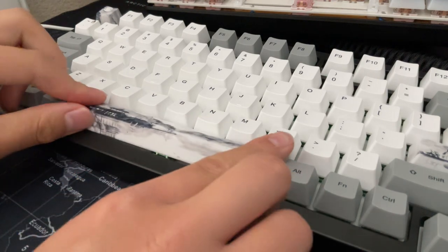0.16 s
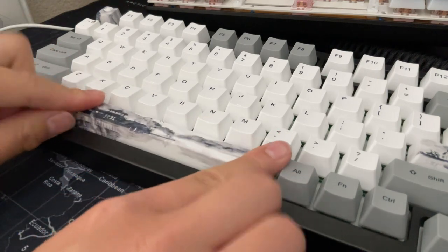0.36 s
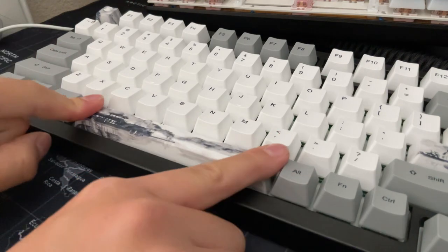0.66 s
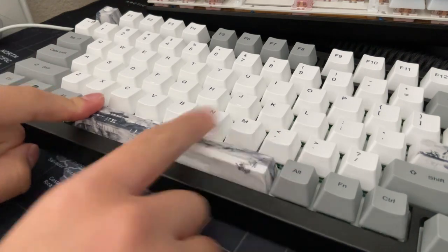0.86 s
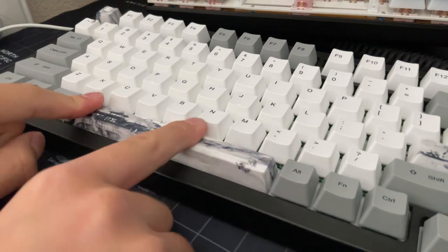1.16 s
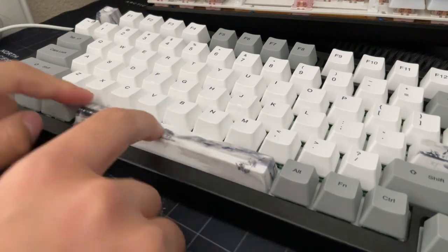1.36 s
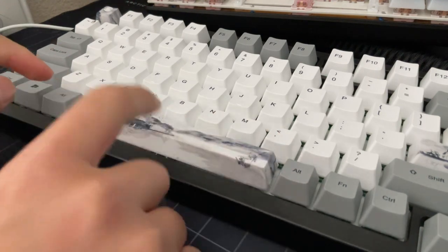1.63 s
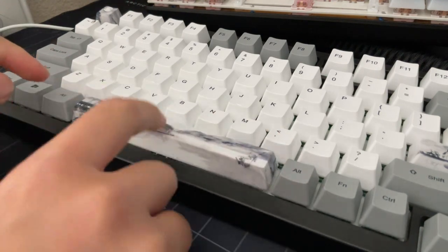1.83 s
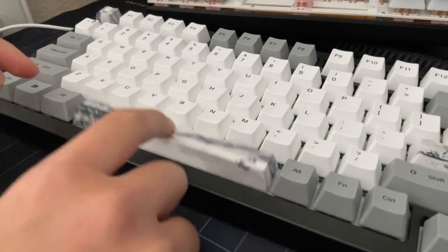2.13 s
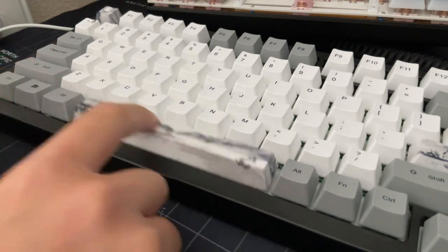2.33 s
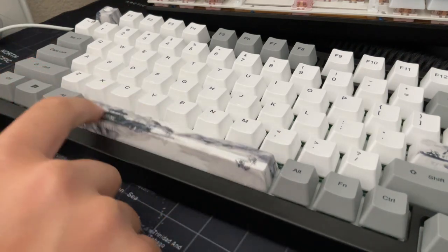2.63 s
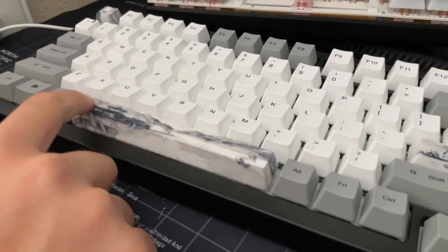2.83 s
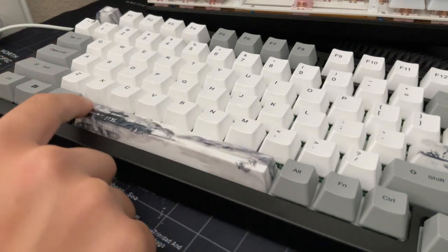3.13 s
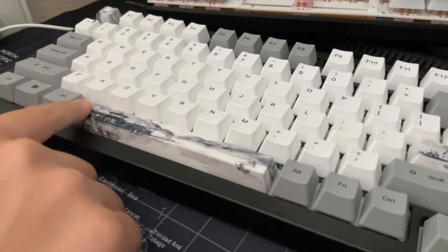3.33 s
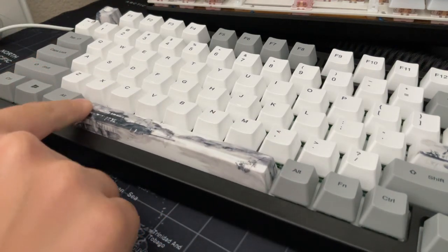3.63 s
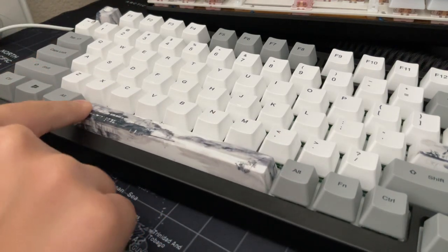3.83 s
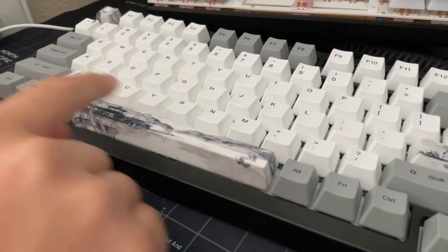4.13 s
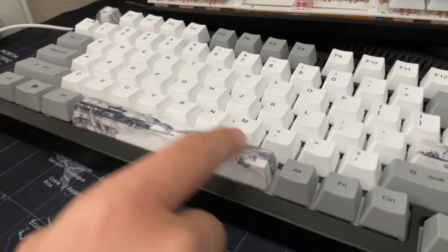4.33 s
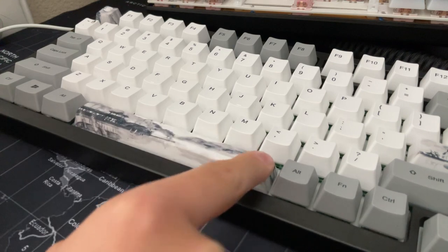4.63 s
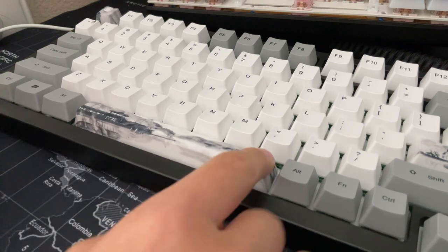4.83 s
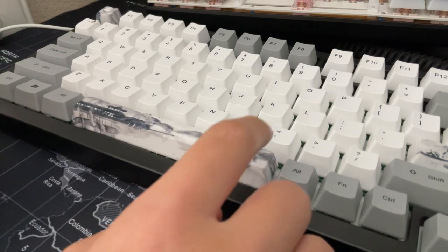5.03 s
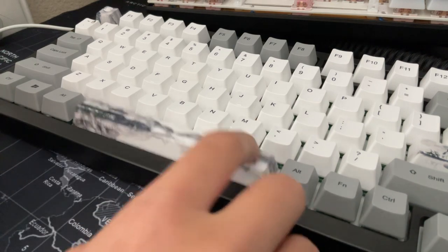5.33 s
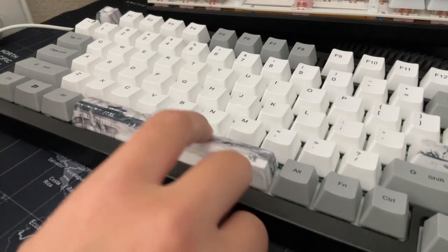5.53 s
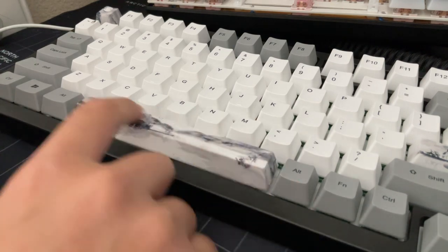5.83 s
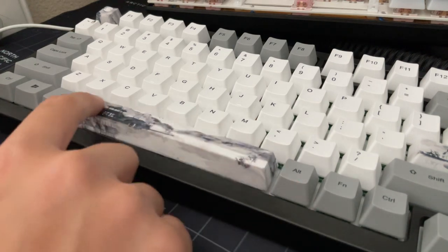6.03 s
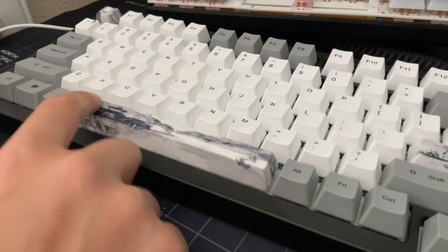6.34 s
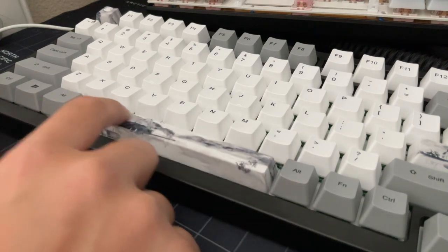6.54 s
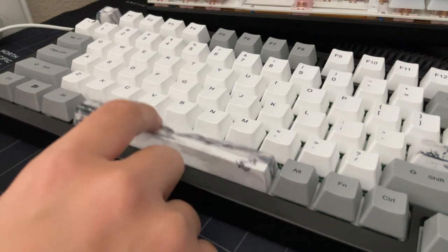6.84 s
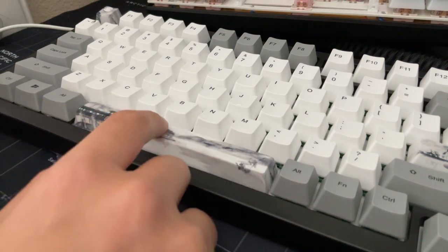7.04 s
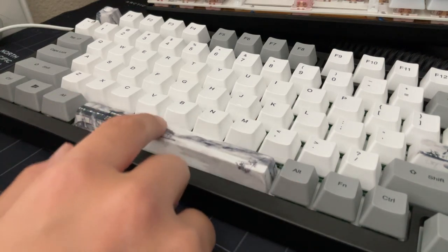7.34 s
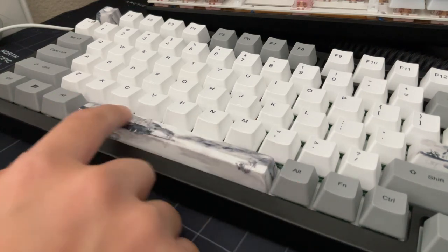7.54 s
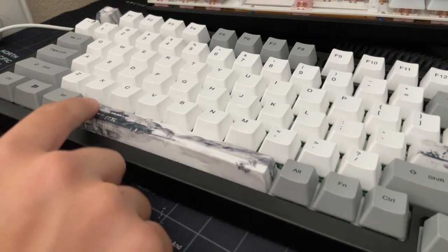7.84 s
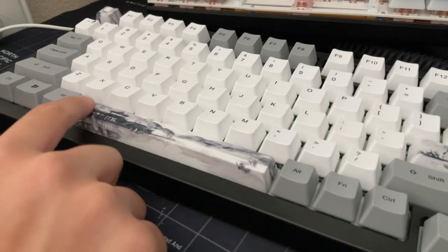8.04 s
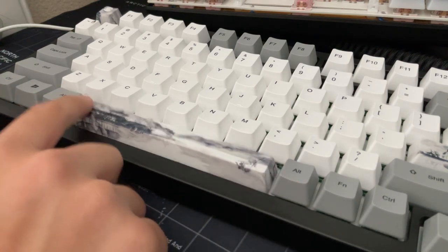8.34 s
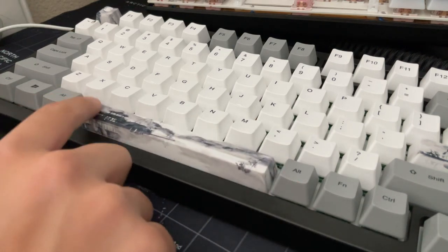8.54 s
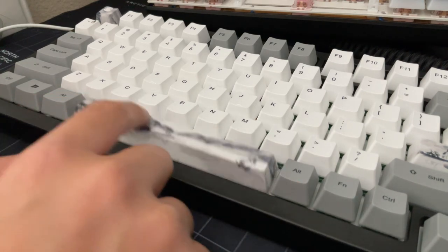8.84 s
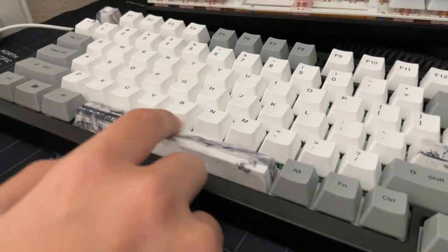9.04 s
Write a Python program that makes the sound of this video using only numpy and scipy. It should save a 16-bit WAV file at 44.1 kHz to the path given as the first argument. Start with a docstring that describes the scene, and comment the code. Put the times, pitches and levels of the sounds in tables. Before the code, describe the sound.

Close, dry space bar clacks come in uneven then steady runs, broken by a short lull of light finger rustle and sparse clicks, over faint hum.

```python
"""Over a faint room hum, fingertips brush keycaps and a palm softly bumps the desk mat.
Then a finger taps the long space key of a mechanical keyboard, close to a microphone in a quiet room.
Strokes clack at the bottom and click more softly on the return: modes of cap, wire, stem, case and desk ring.
Hum and brushing are filtered noise; bumps are falling tones; near echoes and a short tail follow each contact."""
import sys
import numpy as np
from scipy import signal
from scipy.fft import rfft, irfft
from scipy.io import wavfile
from scipy.ndimage import uniform_filter1d

SR = 44100
rng = np.random.default_rng(int(sys.argv[2]) if len(sys.argv) > 2 else 0)


def elevation(decibels):
    """Turn decibel levels (scalar or array-like) into linear amplitude ratios."""
    levels = np.asarray(decibels, float)
    return 10 ** (levels / 20)


def generate_wav(sig):
    """Save sig (samples, or channels by samples) to the path in sys.argv[1] as 16-bit PCM at SR."""
    pcm = np.round(np.clip(np.atleast_2d(sig).T, -1, 1) * 32767).astype(np.int16)
    wavfile.write(sys.argv[1], SR, pcm)


N = 404838  # length in samples


def unit(x):
    """Normalisation: scales a signal to rms 1."""
    return x / np.sqrt(np.mean(x ** 2) + 1e-20)


def along(points, hz):
    """Logarithmic frequency scale: interpolates (f/Hz, value) points at the given frequencies."""
    f, value = np.transpose(points)
    return np.interp(np.log(hz + 1), np.log(f + 1), value)


def noise(spectrum, patchy_db):
    """Spectral shaping: white noise takes a colour, with random gain patches in time and frequency; rms 1."""
    hz, _, z = signal.stft(rng.standard_normal(N + SR), SR, nperseg=512)
    field = uniform_filter1d(rng.standard_normal(z.shape), 6, 0)
    field = uniform_filter1d(field, 6, 1)
    z = z * elevation(along(spectrum, hz)[:, None] + patchy_db * unit(field))
    return unit(signal.istft(z, SR, nperseg=512)[1][:N])


# spectrum of the room hum: f/Hz, relative level/dB per Hz
HUM_SPECTRUM = [(24, -42), (40, -11), (77, 3), (155, -7.5), (290, -4.5), (422, -15), (630, -3), (680, -4),
                (918, -24.5), (1440, -23.5), (1950, -29), (4460, -29.5), (16000, -37.5)]
HUM_DB = -71  # rms


def room_hum():
    """Stationary broadband noise: the faint steady hum of the room."""
    return elevation(HUM_DB) * noise(HUM_SPECTRUM, patchy_db=1.5)


# skin catches on the cap's texture: mean rate, mean size over the steady gain, decay time constant
GRIT_PER_S, GRIT_DB, GRIT_S = 250, -8, 0.002


def grit():
    """Stick-slip friction: a gain that jumps briefly wherever the skin catches."""
    chance, size = rng.random(N), rng.exponential(size=N)
    catches = (chance < GRIT_PER_S / SR) * size
    jumps = signal.lfilter([1], [1, -np.exp(-1 / (GRIT_S * SR))], catches)
    return unit(1 + elevation(GRIT_DB) * jumps)


# fingertips slide over the caps: start t/s, length t/s, hiss level/dB, scrape level over hiss/dB
SLIDES = [(.0, .11, -61.5, -8.5), (0.232, 0.017, -57.5, 3), (.3, 0.14, -65.5, -4), (0.374, 0.039, -63, 2),
          (0.466, 0.056, -68.5, 2.5), (0.523, .13, -58.5, -6.5), (0.742, 0.014, -58.5, -7),
          (.81, 0.12, -60, -9), (1.02, 0.024, -71, -10), (1.17, 0.098, -62, -5.5),
          (3.354, 0.051, -61.5, -9.5), (3.856, .08, -81.5, -5), (4.09, 0.059, -63.5, -3),
          (4.196, 0.09, -55, -9), (4.291, 0.09, -58, -8.5), (4.421, .05, -65.5, -7),
          (4.567, 0.061, -66, -19), (4.844, .1, -73.5, -2), (5.785, 0.22, -64.5, -3.5),
          (6.454, 0.13, -71, -19)]
# airy hiss of sliding skin: f/Hz, relative level/dB per Hz
HISS_SPECTRUM = [(1530, -37), (2600, -8.5), (3790, -3.5), (4290, 1), (7830, -4), (11400, -11.5),
                 (15200, -13), (16000, -14.5), (16400, -29.5)]
# scrape that stirs the cap's resonances: f/Hz, relative level/dB per Hz
SCRAPE_SPECTRUM = [(530, -72.5), (900, -22.5), (969, -6.5), (1250, -9), (1610, -5.5), (2080, -14),
                   (2300, -13.5), (3500, -14), (4550, -44), (7700, -120)]
SWELL_DB_PER_S, FADE_DB_PER_S = 308, 299.5  # how fast a slide starts and stops
# skin shifting on the cap after each contact: levels at a full-scale blow, dB per dB of blow, decay
RUB_HISS_DB, RUB_SCRAPE_DB, RUB_GROWS, RUB_T60_S = -60, -51.5, 0.4, 0.54


def brushing():
    """Friction noise: sliding fingertips give an airy hiss, and a scrape that stirs the cap's resonances."""
    t = np.arange(N) / SR
    hiss_power, scrape_power, blows = np.zeros((3, N))
    for start, length, db, scrape_db in SLIDES:
        before, after = np.maximum(start - t, 0), np.maximum(t - start - length, 0)
        power = elevation(db - SWELL_DB_PER_S * before - FADE_DB_PER_S * after) ** 2
        hiss_power = hiss_power + power
        scrape_power = scrape_power + power * elevation(scrape_db) ** 2
    s, *_, blow_db = contacts()
    blows[np.round(s * SR).astype(int)] = elevation(RUB_GROWS * blow_db) ** 2
    decay = elevation(-60 * t[:SR] / RUB_T60_S) ** 2
    rub = np.abs(signal.fftconvolve(blows, decay)[:N])
    hiss = noise(HISS_SPECTRUM, patchy_db=1.2)
    scrape = noise(SCRAPE_SPECTRUM, patchy_db=1.8)
    hiss, scrape = grit() * np.array([hiss, scrape])
    hiss_gain = np.sqrt(hiss_power + rub * elevation(RUB_HISS_DB) ** 2)
    scrape_gain = np.sqrt(scrape_power + rub * elevation(RUB_SCRAPE_DB) ** 2)
    return hiss_gain * hiss + scrape_gain * scrape


LEAD = SR // 40  # samples of key travel before a blow


def ringing(modes, peak_db, scatter_db, chatter_db, chatter_s, slide_db, detune, hold_s=0):
    """Modal synthesis: each contact (one row) slides, strikes and chatters, exciting damped sine modes."""
    hz, db, t60, rise = np.transpose(modes)[:, :, None]
    t = np.arange(SR // 5) / SR
    # damping sets in once the finger settles, after hold_s
    fade = elevation(db - 60 * np.maximum(t - hold_s, 0) / t60) * (1 - np.exp(-t / rise))
    draws = rng.standard_normal((len(peak_db), 2, len(modes), 1))
    level, pitch = draws.transpose(1, 0, 2, 3)
    tones = np.sin(2 * np.pi * hz * (1 + detune * pitch) * t)
    rows = (elevation(scatter_db * level) * fade * tones).sum(axis=1)
    quick = (np.arange(3 * LEAD) - LEAD) / SR  # time from the blow
    knocks = rng.standard_normal((len(peak_db), len(quick))) ** 3  # spiky: parts touch again unevenly
    chatter, slide = chatter_db - 60 * quick / chatter_s, slide_db + 60 * quick / 0.02
    force = elevation(np.where(quick > 0, chatter, slide)) * knocks
    force[:, LEAD] = 1  # the blow itself
    rows = signal.fftconvolve(rows, force, axes=1)
    return rows * elevation(peak_db)[:, None] / np.abs(rows).max(axis=1, keepdims=True)


# a palm bumps the mat: t/s, peak level/dB, first f/Hz, last f/Hz, swell t/s
THUDS = [(0.019, -53, 196, 60, 0.025), (0.381, -26, 343, 71.6, 0.012), (0.747, -51.5, 304, 67.6, 0.0085),
         (.47, -51.5, 120, 59.4, 0.036), (.54, -52, 145, 59.4, 0.027), (0.827, -54, 150, 60, 0.011),
         (0.908, -41, 259, 70, 0.0113), (1.172, -56, 250, 70, 0.013)]
# modes of the desk: f/Hz, relative level/dB, 60 dB decay t/s, rise t/s
DESK_MODES = [(67, -12.5, 0.17, 0.0066), (72, -15, 0.19, 0.0061), (121.8, -4, 0.13, 0.033),
              (196.3, 0.5, 0.1, 0.0087), (227, 0.5, 0.11, 0.024)]
THUD_DESK_DB, THUD_ROUGH = -2.5, 0.82  # desk ring over the bump; rms phase wobble in radians


def thuds():
    """Dispersion of bending waves in the desk top: high pitches lead, so bumps fall in pitch; the desk rings on."""
    out, t = np.zeros(N + SR), np.arange(SR // 5) / SR
    rings = ringing(DESK_MODES, np.array(THUDS)[:, 1] + THUD_DESK_DB, scatter_db=0.0,
                    chatter_db=-39.5, chatter_s=0.038, slide_db=-75, detune=0.044)
    for (s, db, first_hz, last_hz, swell), ring in zip(THUDS, rings):
        pitch = last_hz + (first_hz - last_hz) * np.exp(-t / 0.0168)
        shape = (t / swell * np.exp(1 - t / swell)) ** 2
        wobble = uniform_filter1d(rng.standard_normal(len(t)), size=150)
        wobble = unit(uniform_filter1d(wobble, size=150))
        phase = 2 * np.pi * np.cumsum(pitch) / SR + THUD_ROUGH * wobble
        start = round(s * SR)
        out[start:][:len(t)] += elevation(db) * shape * np.sin(phase)
        out[start:][:len(ring) - LEAD] += ring[LEAD:]
    return out[:N]


# the key hits bottom, and the first two rows are two soft knocks on the keyboard: t/s, cap level/dB, bar level
# over cap/dB, stem level over cap/dB
PRESSES = [(0.0174, -31, -6.5, -4), (0.3785, -27.5, -4.5, -4), (1.3568, -5.5, -9.5, -12),
           (1.6187, -16.5, -10.5, -7), (1.7625, -3, -15, -14), (1.923, -5, -10.5, -11),
           (2.0971, -5.5, -12.5, -13), (2.2676, -14.5, -5, -11.5), (2.4476, -15, -5, -7.5),
           (2.6204, -40, 3, -19), (2.7481, -18.5, -2, -8.5), (2.9332, -20, -3.5, -16),
           (3.0964, -13, -4.5, -10), (4.1027, -14, -8.5, 2.5), (4.1174, -30, 2.5, 1), (4.4848, -15, -7, -4),
           (4.9716, -47.5, 7.5, 0.5), (5.1358, -7, -8, -12.5), (5.3053, -13.5, -5.5, -11),
           (5.4625, -10, -8, -8.5), (5.6457, -16, -5.5, -8.5), (5.7967, -20.5, -7, -9),
           (5.9564, -17, -6, -7), (6.1085, -29.5, 2.5, -9.5), (6.2412, -21, -1.5, -9.5),
           (6.3932, -18, -5, -14), (6.5666, -41, 6.5, -7), (6.7176, -11.5, -9.5, -12),
           (6.8838, -27.5, 1.5, -8.5), (7.0264, -9, -8.5, -11.5), (7.201, -15.5, -6, -16),
           (7.3657, -15, -7, -11.5), (7.5223, -23.5, -1, -8.5), (7.8615, -13, -6.5, -15),
           (8.0347, -12, -8, -13), (8.2087, -11, -8.5, -16), (8.37, -17, -3.5, -16), (8.544, -31, 2, -8.5),
           (8.7251, -16, -6, -15.5), (8.8847, -15.5, -4, -10)]
# the key springs back against its top stop: t/s, cap level/dB, bar level over cap/dB, stem level over cap/dB
RETURNS = [(1.8332, -27, -0.5, 1.5), (2.0088, -27.5, 1, 2), (2.173, -28, 0.5, 1), (2.369, -29, -1, -1),
           (2.6848, -36.5, 3.5, -2), (2.8624, -32, 0.5, -1), (3.0101, -56, 4, 0), (4.2682, -26, -3.5, -4.5),
           (5.228, -33, 1, 2.5), (5.3787, -24, -3.5, -3), (5.5503, -29, -3, -1), (5.7119, -26.5, -3.5, 0.5),
           (5.8631, -29.5, -0.5, 2), (6.0362, -35.5, -0.5, -4), (6.6233, -27.5, -3.5, -1.5),
           (6.7955, -29.5, -4, -0.5), (6.9471, -26, 2, -1), (7.1297, -42.5, 2, -1), (7.2809, -33, 1.5, 0),
           (7.4525, -42, 2.5, -1), (7.6311, -35, 1, -1.5), (7.7842, -33, 1, -4), (7.9488, -32, 2, 0.5),
           (8.1165, -31, 0.5, -1.5), (8.2846, -32.5, 0.5, -1.5), (8.4442, -28.5, -0.5, -2),
           (8.6218, -37, 1.5, -2.5), (8.7974, -28, -4.5, 0), (8.9735, -33, -0.5, -1),
           (9.1346, -30.5, -1.5, -3)]
# the fingertip lands on the cap: t/s, cap level/dB
TOUCHES = [(1.1782, -51), (2.346, -56.5), (4.633, -50), (5.4352, -46), (5.9219, -41.5), (6.6848, -46),
           (7.1744, -47), (7.334, -51), (7.831, -43), (8.009, -41), (8.1807, -45), (8.335, -49),
           (8.5048, -42), (8.6885, -51), (8.85, -49), (9.1167, -47)]
# the stem ticks in its guide as the key starts to rise: t/s, stem level/dB
LIFTS = [(.309, -61), (.7714, -58), (.8915, -44), (2.1525, -41.5), (3.9389, -63), (4.21, -39),
         (5.5339, -44.5), (5.844, -48), (6.777, -41.5), (7.4224, -51.5), (7.9288, -41.5), (8.4256, -45),
         (8.95, -59)]
# one end of the long key lands first and rattles its wire: t/s, bar level/dB
RATTLES = [(2.2625, -35), (2.4448, -44), (2.608, -43.5), (6.1548, -46)]
TOUCH_BAR_DB, TOUCH_STEM_DB = -8, -9  # over the cap
LIFT_CAP_DB, LIFT_BAR_DB = -6, -15  # over the stem
RATTLE_CAP_DB, RATTLE_STEM_DB = -9, -8  # over the bar


def contacts():
    """Impact excitation: time and cap, bar and stem levels of every contact, and the blow reaching the case."""
    rows = [(s, db, db + bar, db + stem) for s, db, bar, stem in PRESSES + RETURNS]
    rows += [(s, db, db + TOUCH_BAR_DB, db + TOUCH_STEM_DB) for s, db in TOUCHES]
    rows += [(s, db + LIFT_CAP_DB, db + LIFT_BAR_DB, db) for s, db in LIFTS]
    rows += [(s, db + RATTLE_CAP_DB, db, db + RATTLE_STEM_DB) for s, db in RATTLES]
    s, cap_db, bar_db, stem_db = np.transpose(rows)
    blow_db = 20 * np.log10(np.hypot(elevation(cap_db), elevation(bar_db)))
    return s, cap_db, bar_db, stem_db, blow_db


# spectrum of plastic on plastic: f/Hz, relative level/dB per Hz
SNAP_SPECTRUM = [(700, -49.5), (1500, -6), (3000, -4.5), (3600, -5), (6000, 3), (10000, -8.5), (13500, -12),
                 (16000, -15)]
SNAP_T60_S = 0.0091
TRAVEL_DB, TRAVEL_S = -32.5, 0.013  # the stem scuffs its guide just before a snap: level over it, duration


def snaps(peak_db, size):
    """Impulsive contact noise: one short dry burst per contact, with no ring, after the scuff of key travel."""
    t = (np.arange(size) - LEAD) / SR
    colour = elevation(along(SNAP_SPECTRUM, np.fft.rfftfreq(size, 1 / SR)))
    burst = elevation(-60 * np.abs(t) / SNAP_T60_S)
    scuff = elevation(TRAVEL_DB) * np.exp(-(t / TRAVEL_S) ** 4)
    white = rng.standard_normal((len(peak_db), size))
    rows = irfft(rfft(white) * colour, size) * np.where(t >= 0, burst, scuff)
    return rows * elevation(peak_db)[:, None] / np.abs(rows).max(axis=1, keepdims=True)


# reverberation of the room: f/Hz, 60 dB decay t/s
ROOM_DECAY = [(100, 0.7), (500, 0.42), (2000, 0.21), (6000, 0.15), (14000, 0.21)]
# echoes off nearby surfaces: delay t/s, level over the direct sound/dB
WALLS = [(.0025, -21.5), (.0055, -21.5), (.011, -23.5), (0.02, -27)]


def room_answer(rows, tail_db):
    """Reverberation by convolution: near echoes and a tail, new for each contact, decaying by frequency."""
    hz, t, z = signal.stft(rng.standard_normal((len(rows), SR // 4)), SR, nperseg=256)
    tail = signal.istft(z * elevation(-60 * t / along(ROOM_DECAY, hz)[:, None]), SR, nperseg=256)[1]
    tail = tail * (1 - np.exp(-np.arange(tail.shape[1]) / SR / 0.0089))  # the tail builds up
    tail = elevation(tail_db) * tail / np.linalg.norm(tail, axis=1, keepdims=True)
    tail[:, 0] = 1  # direct sound
    for delay, db in WALLS:
        tail[:, round(delay * SR)] += elevation(db)
    return signal.fftconvolve(rows, tail, axes=1)


# modes of each part; columns of all four: f/Hz, relative level/dB, 60 dB decay t/s, rise t/s
# the keycap
CAP_MODES = [(1695, -17.5, 0.029, .002), (1847, -9.5, 0.005, 0.0005), (1980, -1, 0.0034, 0.0013),
             (2253, -10, 0.014, 0.002), (2487, -11.5, 0.01, 0.0008), (2898, -16, 0.008, 0.001)]
# the wire bar under the long key
BAR_MODES = [(1195, -20.5, 0.025, 0.003), (1409, -16, 0.06, 0.003), (1479, 4, 0.015, 0.002),
             (1426, -11, 0.0088, .004), (1505, -14.5, 0.032, 0.005)]
# the stem in its guide
STEM_MODES = [(4425, -10, 0.009, 0.00065), (4560, -6, 0.01, 0.0006), (5690, -6, 0.0068, 0.0002),
              (7380, -12, 0.0035, 0.0002), (9310, -9.5, 0.0028, 0.00023)]
# the keyboard case
CASE_MODES = [(298, -6.5, 0.02, 0.0055), (338.1, 0, 0.062, 0.011), (376, -4, 0.04, .005),
              (405.4, -2.5, 0.039, 0.004), (475.4, -3, 0.033, 0.0053), (700, -17.5, 0.05, 0.0027),
              (878, -15.5, 0.041, .002)]
CASE_DB, CASE_GROWS = -18.5, 0.69  # level at a full-scale blow, dB per dB of blow
DESK_DB, DESK_GROWS = -30, 0.56
KEY_DETUNE, BOARD_DETUNE = 0.006, 0.015  # share by which modes shift from blow to blow


def taps():
    """Modal response to impact: bright parts ring at once; case and desk swell a few milliseconds later."""
    s, cap_db, bar_db, stem_db, blow_db = contacts()
    case_db = CASE_DB + CASE_GROWS * blow_db
    desk_db = DESK_DB + DESK_GROWS * blow_db
    cap = ringing(CAP_MODES, cap_db, detune=KEY_DETUNE, scatter_db=2.0,
                  chatter_db=-45.0, chatter_s=0.035, slide_db=-57, hold_s=0.002)
    bar = ringing(BAR_MODES, bar_db, detune=KEY_DETUNE, scatter_db=4.5,
                  chatter_db=-34.0, chatter_s=0.03, slide_db=-46.5)
    stem = ringing(STEM_MODES, stem_db, detune=KEY_DETUNE, scatter_db=5.5,
                   chatter_db=-29.0, chatter_s=0.028, slide_db=-48.5)
    case = ringing(CASE_MODES, case_db, detune=BOARD_DETUNE, scatter_db=4.0,
                   chatter_db=-41.5, chatter_s=0.032, slide_db=-49.0)
    desk = ringing(DESK_MODES, desk_db, detune=0.043, scatter_db=3.0,
                   chatter_db=-47.5, chatter_s=0.042, slide_db=-48)
    rows = cap + bar + stem + case + desk
    rows = rows + snaps(stem_db, size=rows.shape[1])  # snaps peak level with the stem
    out = np.zeros(N + SR)
    starts = np.round(s * SR).astype(int)
    for start, row in zip(starts, room_answer(rows, tail_db=-20.0)):
        out[start:start + len(row)] += row
    return out[LEAD:N + LEAD]  # blows, not key travel, fall on the listed times


def scene():
    """Superposition: hum, brushing, thuds and taps add linearly into one channel."""
    return (room_hum() + brushing() + thuds() + taps())[None]


def top_cut(x):
    """Nothing passes above the cut-off."""
    return signal.sosfilt(signal.butter(12, 16820, fs=SR, output="sos"), x)


def record(dry):
    """High-pass filtering: the microphone cuts the deepest bass, below 50 Hz."""
    cut = signal.butter(N=6, Wn=50, btype="high", fs=SR, output="sos")
    mix = signal.sosfilt(cut, dry)
    return top_cut(mix)


dry = scene()
out = record(dry)
generate_wav(out)
```